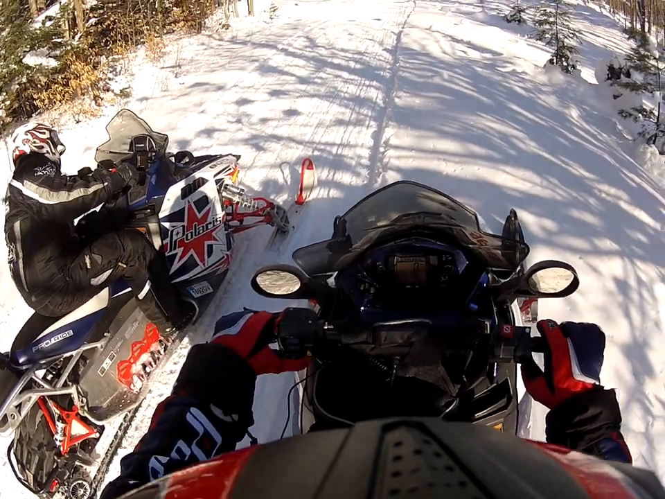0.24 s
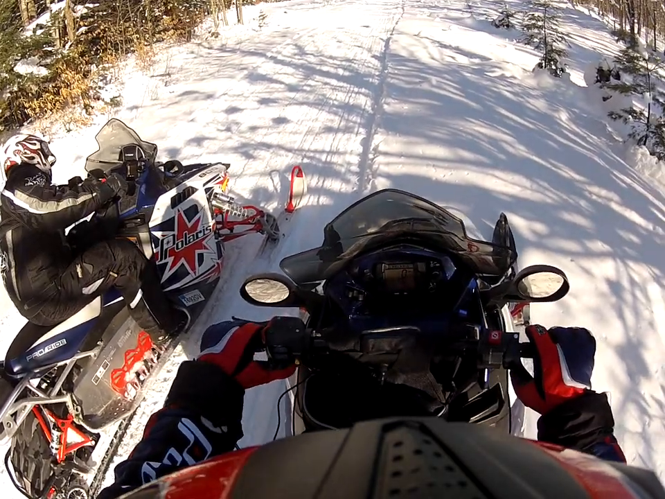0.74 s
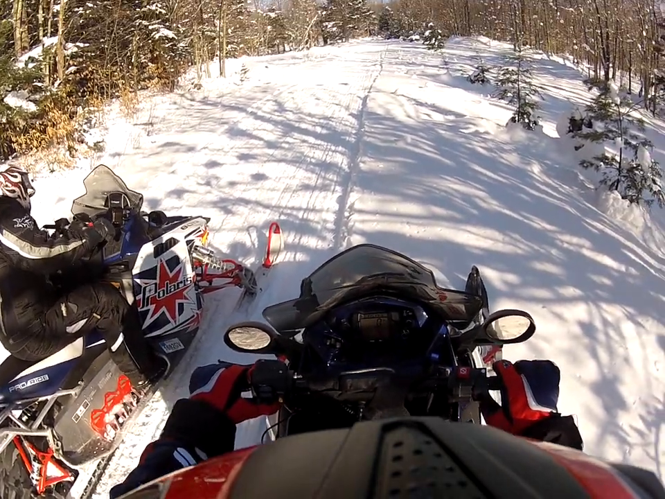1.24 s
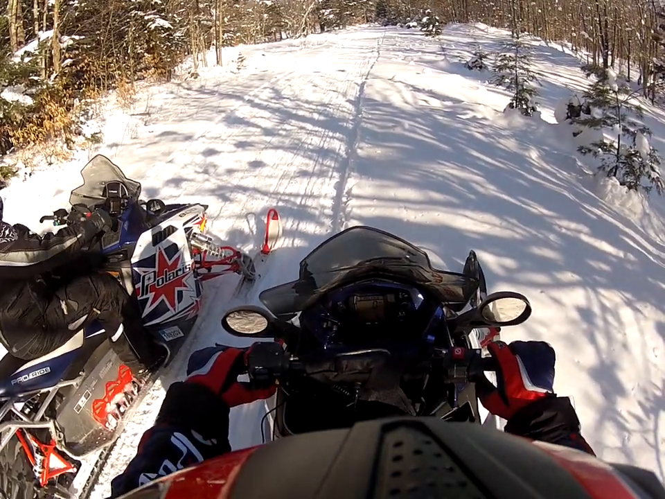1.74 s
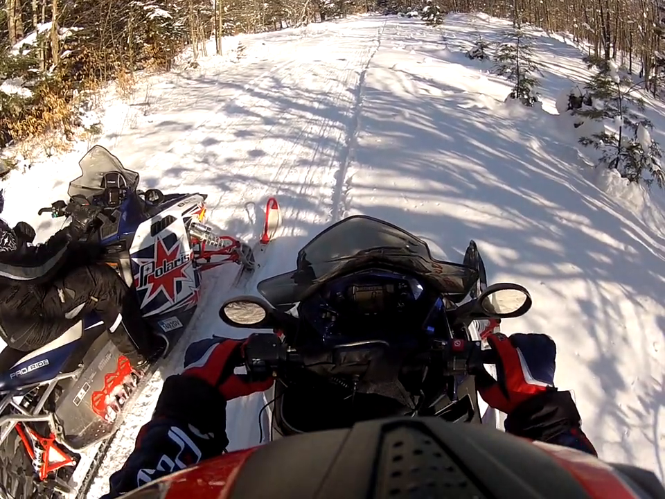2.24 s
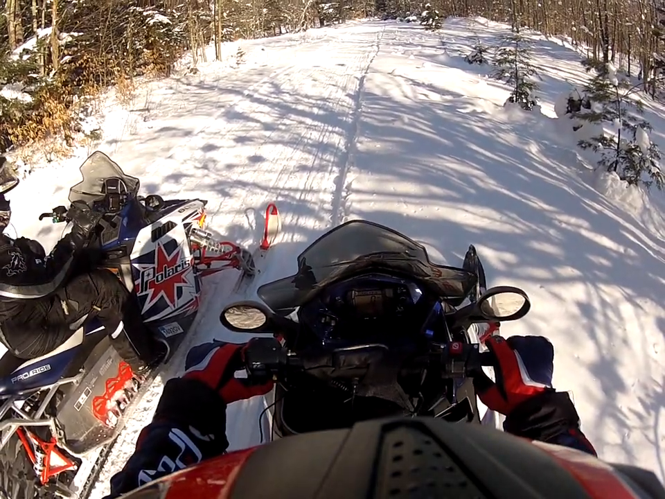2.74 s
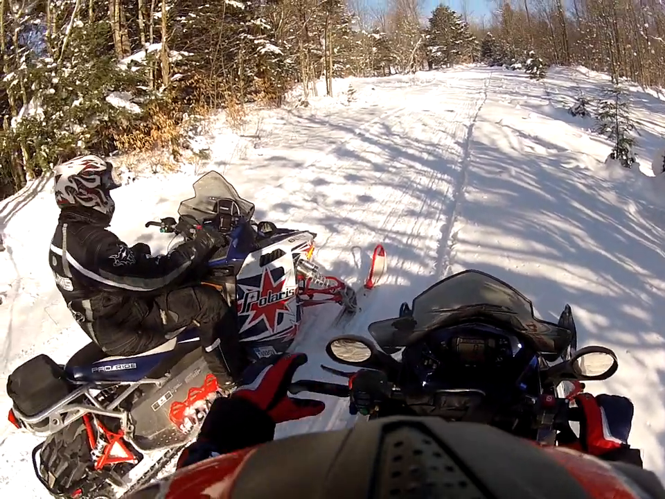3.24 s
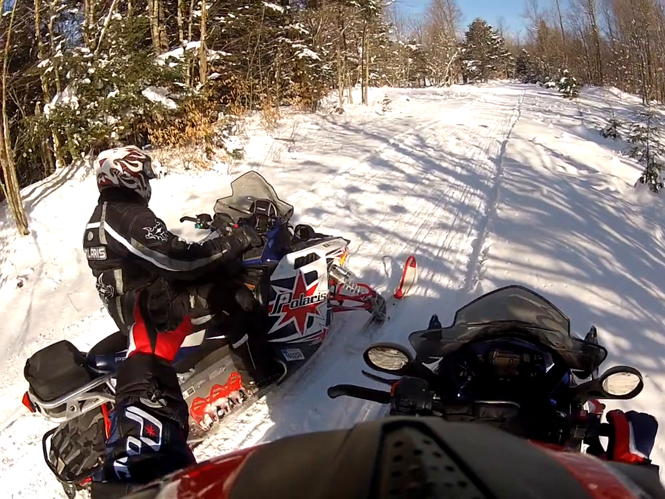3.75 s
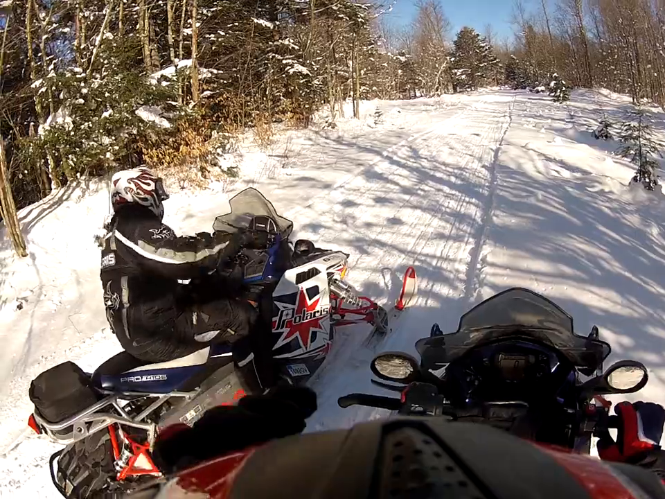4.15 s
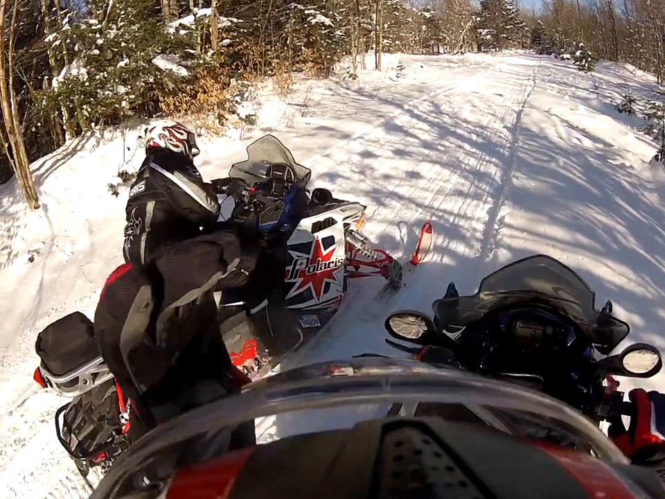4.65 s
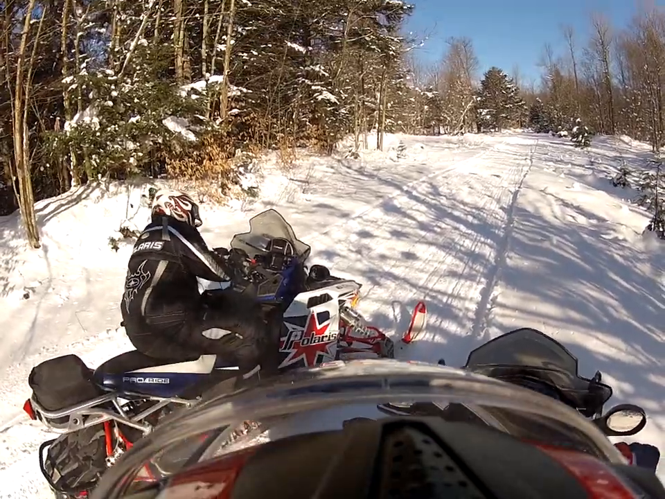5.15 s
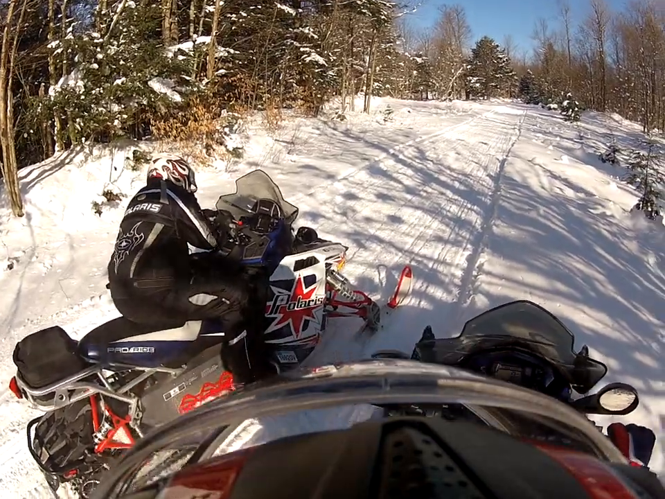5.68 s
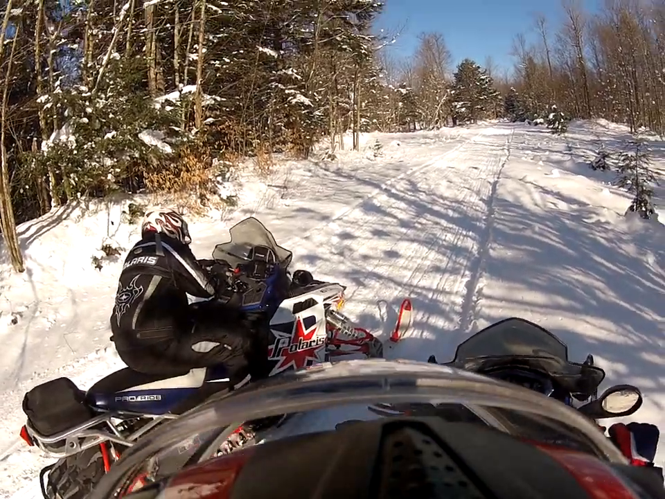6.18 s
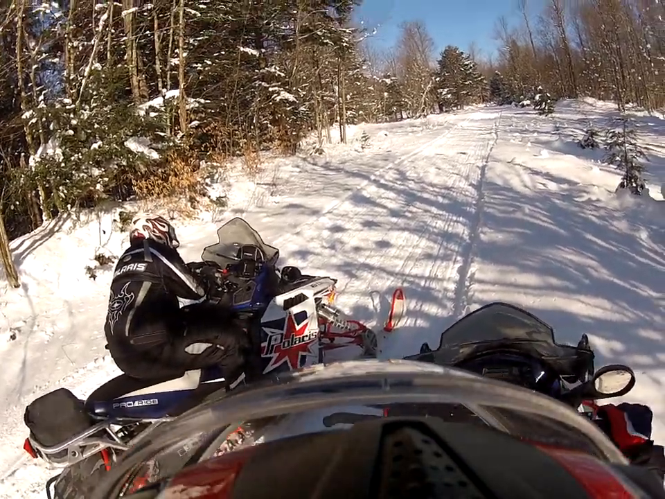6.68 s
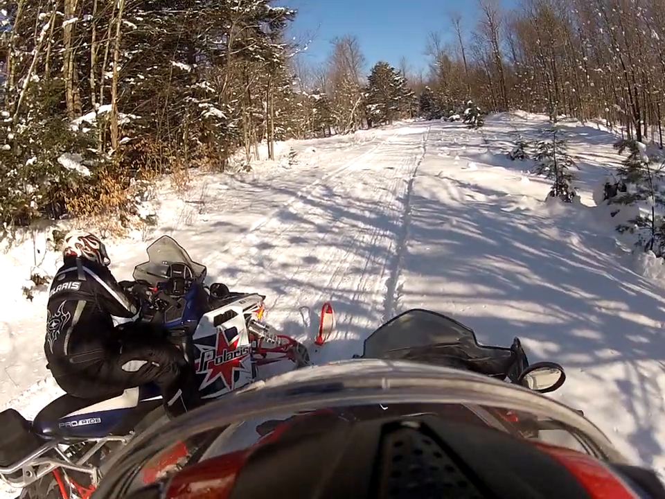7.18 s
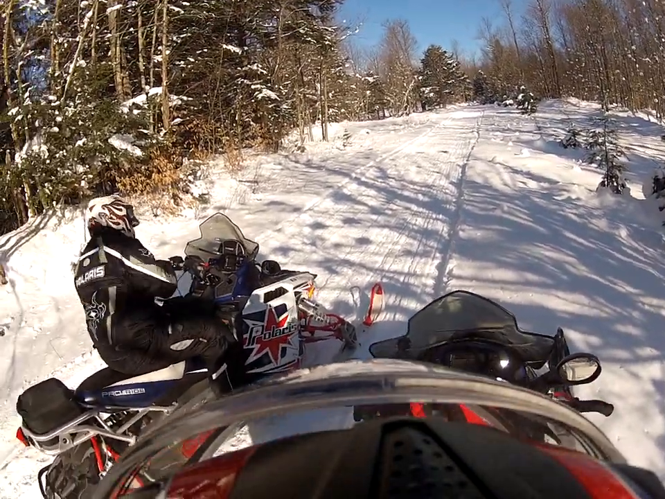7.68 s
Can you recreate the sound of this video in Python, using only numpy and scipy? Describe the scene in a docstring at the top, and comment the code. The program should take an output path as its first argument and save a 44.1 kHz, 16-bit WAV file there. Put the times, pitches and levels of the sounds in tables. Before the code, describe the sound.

Two snowmobiles idle side by side outdoors on a snowy trail, heard by a microphone on a rider's helmet. One two-stroke pops raggedly and falters; a four-stroke hums low with a light mechanical clatter. Midway, clothing rustles and small knocks tick close by, then the visor scrapes up in jolts and hits its stop with a loud, overloaded thump. The idling continues with faint rustles.

```python
"""A two-stroke engine pops unevenly over the hum of a four-stroke: two snowmobiles idle on a snowy trail,
heard through a rider's helmet microphone. Clothing rustles and ticks as the rider turns, then the visor scrapes
up over its detents and thumps against its stop, overloading a narrow-band recorder. Gas pushes ring a pipe,
crank orders hum, shaped noise clatters and rubs, and decaying sines make the blows."""
import sys
import numpy as np
from scipy import signal
from scipy.fft import rfft, irfft, next_fast_len
from scipy.io import wavfile
from scipy.ndimage import map_coordinates

SR = 44100
rng = np.random.default_rng(int(sys.argv[2]) if len(sys.argv) > 2 else 0)


def transcribe(u):
    """Save the signal u as a 16-bit wav file named by the first command-line argument.

    u: samples, shape (n,) or (channels, n), limited to [-1, 1]; the rate is SR.
    q: integer samples, one column per channel.
    """
    v = np.clip(np.atleast_2d(u).T, -1, 1)
    q = np.round(v * 32767).astype(np.int16)
    wavfile.write(sys.argv[1], SR, q)


N = 349255

STOP_S = 4.6535  # the visor reaches its stop

# The two-stroke's idle. Each row: time in seconds, mean firings per second, relative drone level in dB.
TWO_STROKE_IDLE = [(0, 38.8, -34.5), (.7, 38.8, -35), (1.35, 37.8, -37), (2, 39.4, -35.5), (2.9, 40.1, -37),
                   (3.3, 39.7, -38), (3.9, 41, -35.5), (4.4, 37.7, -36), (4.95, 40, -34.5),
                   (5.5, 40.5, -33.5), (5.9, 40, -34), (6.4, 40.8, -34.5), (7.2, 41.6, -39), (7.9, 40, -35)]
# Moments when it falters. Each row: middle in seconds, half length in seconds.
FALTERS = [(0.171, 0.043), (0.354, 0.033), (0.646, 0.039), (0.877, 0.016), (1.04, 0.071), (1.674, 0.053),
           (1.84, 0.055), (2.103, 0.012), (2.41, .04), (2.554, .06), (3.06, 0.054), (4.154, 0.04),
           (5.64, 0.078), (6.1, 0.021), (6.494, 0.043), (6.716, .06), (7.151, .07), (7.52, 0.023)]
# The exhaust pipe's resonance. Each row: frequency in Hz, relative level in dB.
EXHAUST_PIPE = [(8, -68), (28, -26.5), (46, -20), (68, -0.5), (81, 5), (95, 8), (115, -1.5), (132, 0),
                (158, -13), (192, -13.5), (245, -6), (280, -12.5), (306, -6.5), (370, -25), (700, -38)]
FALTER_DB = -12.5  # sag of the drone and of the quiet firings in a falter


def two_stroke(pop_db=0.0, drone_db=-3.5, under_db=-5.0, open_db=-7, octave_db=-19, lag_s=0.0032,
               waver_db=2.0, roam=0.57):
    """Source and resonator: firings excite the pipe, over a drone at two, three and six times their rate."""
    rate, level_db = curves(TWO_STROKE_IDLE)
    turns = firing_turns(rate)
    dips = sum(np.exp(-((clock() - s) / half) ** 2) for s, half in FALTERS)
    falter = np.minimum(dips, 1)
    # the drone lags the firings
    phase = 2 * np.pi * (turns - lag_s * rate)
    swell = amp(level_db + drone_db + FALTER_DB * falter + waver_db * wobble(22))
    third_order = np.cos(3 * phase + roam * wobble(18))
    sixth_order = amp(octave_db) * np.cos(6 * phase + wobble(30))
    # the second order drops once the visor is open
    under_level = amp(under_db + open_db * (clock() > STOP_S))
    second_order = under_level * np.cos(2 * phase + roam * wobble(11))
    drone = np.sqrt(2) * swell * (third_order + sixth_order + second_order)
    pops = amp(pop_db) * through(firings(turns, falter), EXHAUST_PIPE)
    return -(drone + pops)


# Single pops of the two-stroke, mostly its loudest, one short and sharp. Each row: time in seconds,
# push strength in dB, push length in seconds (the standard deviation of its bell).
SINGLE_POPS = [(.564, -23.5, 0.00043), (.794, -27, 0.0008), (1.115, -29, 0.00036), (1.309, -24.5, 0.00074),
               (1.556, -25.5, 0.00065), (1.896, -27, .0005), (2.144, -26, 0.00072), (2.346, -26, 0.0005),
               (2.62, -28.5, .0006), (2.882, -27, 0.00054), (3.506, -28, 0.00061), (4.038, -27.5, 0.00056),
               (4.209, -26.5, .0007), (4.931, -28.5, 0.0004), (5.494, -27, 0.00065), (5.628, -32, .0002),
               (5.793, -25, 0.0011), (6.144, -28, 0.00054), (6.547, -29, 0.00058), (7.266, -28.5, 0.00065),
               (7.813, -27.5, .0003)]
HUNT = 0.0319  # scale of the firing rate's random wander, as a share of the rate


def firing_turns(rate):
    """Frequency integrates to phase: revolutions of the hunting crank, bent so each single pop is a firing."""
    turns = np.cumsum(rate * (1 + HUNT * wobble(13))) / SR
    single_s = np.transpose(SINGLE_POPS)[0]
    lead = np.unwrap(np.interp(single_s, clock(), turns) % 1, period=1)
    return turns - np.interp(clock(), single_s, lead)


POP_SHARE = .31  # average share of the firings that catch hard
POP_DB, POP_SCATTER_DB = -29.5, 1.5  # push strength of an ordinary pop and its random spread
FULL_PUSH_S, LEAN_PUSH_S, LEAN_DB = 0.0005, 0.00026, -1  # in a falter the pops turn short, sharp and weaker
AFTER_DB = -8  # the firing that follows a pop is still strong: its level below the pop


def firings(turns, falter, jitter_s=.0014, soft_db=-44, scatter_db=4, length_spread=0.24):
    """Irregular combustion: one gas push a revolution, most soft, some catching hard, plus the single pops."""
    single_s, single_db, single_length = np.transpose(SINGLE_POPS)
    single_numbers = np.round(np.interp(single_s, clock(), turns))
    numbers = np.setdiff1d(np.arange(1, int(turns[-1])), single_numbers)
    times = np.interp(numbers, turns, clock())
    slip, size, stretch, luck = rng.standard_normal((512, 4))[:len(times)].T
    # unburnt fuel gathers at an uneven pace until a firing catches
    fuel = np.cumsum(POP_SHARE * np.exp(.5 * luck - .125))
    hard = np.diff(np.floor(fuel), prepend=0) > 0
    lean = np.interp(times, clock(), falter)
    pop_db = POP_DB + POP_SCATTER_DB * size + LEAN_DB * lean
    after_pop = np.roll(hard, 1)
    quiet_db = np.where(after_pop, POP_DB + AFTER_DB, soft_db) + scatter_db * size + FALTER_DB * lean
    sizes = amp(np.where(hard, pop_db, np.minimum(quiet_db, POP_DB)))
    mean_length = FULL_PUSH_S + (LEAN_PUSH_S - FULL_PUSH_S) * lean
    lengths = mean_length * np.exp(length_spread * stretch)
    ordinary = pushes(times + jitter_s * slip, sizes, lengths)
    return ordinary + pushes(single_s, amp(single_db), single_length)


def pushes(times, sizes, lengths):
    """Time-bandwidth reciprocity: of these bell-shaped gas pushes, a longer one sounds duller."""
    steps = np.arange(-SR // 200, SR // 200)
    shapes = np.exp(-.5 * (steps / SR / np.reshape(lengths, (-1, 1))) ** 2)
    shapes = sizes[:, None] * shapes / shapes.sum(axis=1, keepdims=True)
    places = np.clip(np.round(times * SR).astype(int)[:, None] + steps, 0, N)
    return np.bincount(places.ravel(), shapes.ravel(), N + 1)[:N]


# The helmet jolting as the hand grips the visor and lifts it over its detents.
# Each row: time in seconds, relative strength in dB, rocking frequency in Hz.
DETENTS = [(4.249, -26, 45), (4.35, -34, 84.5), (4.497, -20.5, 100.3), (4.531, -4, 66.5), (4.567, -1, 52.8),
           (4.6016, -9.5, 67.4), (4.624, -14, 50)]
BOOM_HZ, BOOM_T60 = 70, .29  # the visor's boom and its 60 dB decay in seconds


def visor(jolt_cycles=0.66, snap_db=-9, boom_db=-0.5, slam_db=7, slam_t60=0.044, rise_s=0.0036):
    """Impulsive excitation: each detent rocks the helmet briefly; the stop leaves a damped boom."""
    def rock(cycles):
        """A windowed sine: one rocking motion about its middle."""
        return np.sin(2 * np.pi * cycles) * np.exp(-(cycles / jolt_cycles) ** 2)

    jolts = 0
    for s, db, hz in DETENTS:
        cycles = (clock() - s) * hz
        # a sharper snap sits inside the jolt
        jolts = jolts + amp(db) * (rock(cycles) + amp(snap_db) * rock(2 * cycles))
    t = np.maximum(clock() - STOP_S, 0)
    boom = amp(boom_db - 60 * t / BOOM_T60)
    slam = amp(slam_db - 60 * t / slam_t60)
    swing = (boom + slam) * (1 - np.exp(-t / rise_s))
    return jolts - swing * np.sin(2 * np.pi * BOOM_HZ * t) + clack()


# The visor's clack on its stop. Each row: frequency in Hz, starting level in dB, 60 dB decay in seconds.
CLACK_MODES = [(204, -4.5, 0.029), (390, -3.5, 0.017), (648, -5, 0.009), (956, -6.5, 0.0061),
               (1260, -14.5, 0.029), (2210, 6, 0.0093)]
CLACK_S = 4.66  # the visor's edge snaps home


def clack():
    """Modal synthesis: the stiff plastic rings for a few milliseconds as a sum of damped sines."""
    t = np.maximum(clock() - CLACK_S, 0)
    return sum(amp(db - 60 * t / t60) * np.sin(2 * np.pi * hz * t) for hz, db, t60 in CLACK_MODES)


# The four-stroke's hum. Each row: multiple of the crank speed, middle level in dB rms.
HUM_ORDERS = [(1, -56.5), (2, -48.5), (4, -50), (8, -62), (10, -67.5)]


def four_stroke(turns, waver_db=4.5):
    """Order synthesis: steady multiples of the crank speed, each slowly wavering in strength."""
    hum = 0
    for order, db in HUM_ORDERS:
        level = np.sqrt(2) * amp(db + waver_db * wobble(5.3))
        hum = hum + level * np.sin(2 * np.pi * (order * turns + rng.random()))
    return hum


# The four-stroke's mechanical noise. Each row: time in seconds, relative level in dB.
CLATTER_LEVEL = [(0, -54), (1.1, -55), (3, -56.5), (4.3, -53), (4.6, -53), (4.72, -65), (4.85, -55.5),
                 (6.5, -56), (7.2, -57), (7.9, -56.5)]
# Colour of the clatter with the visor shut. Each row: frequency in Hz, relative density in dB per Hz.
CLATTER_SHUT = [(240, -25), (400, -2.5), (580, -6), (637, -11), (811, -12), (907, -2), (1110, -10.5),
                (1220, -0.5), (1620, -2.5), (1770, -7.5), (2060, 3), (2280, -9), (2800, -10), (3100, -18),
                (3700, -11.5), (4810, -66), (8140, -120)]
# Colour of the clatter with the visor open. Each row: frequency in Hz, relative density in dB per Hz.
CLATTER_OPEN = [(240, -17.5), (400, 5), (460, -6.5), (631, -3.5), (850, -10.5), (907, -1), (987, -12),
                (1090, 0), (1300, 3.5), (1460, -5), (1810, -0.5), (1980, -4.5), (2220, 2.5), (2530, -10.5),
                (3700, -11), (4810, -53), (8140, -120)]


def clatter(turns, level_db=1, beat_db=1.0, flutter_db=1.0):
    """Modulated noise: it beats with the crank, changes colour as the visor opens and dips at the thump."""
    # four beats a revolution
    drive = amp(beat_db * np.cos(8 * np.pi * turns) + flutter_db * wobble(60))
    shut = unit(through(drive * rng.standard_normal(N), CLATTER_SHUT))
    opened = unit(through(drive * rng.standard_normal(N), CLATTER_OPEN))
    # equal-power crossfade from the first scrape to the stop
    lift = np.interp(clock(), [SCRAPES[0][0], STOP_S], [0, np.pi / 2])
    level = amp(curves(CLATTER_LEVEL)[0] + level_db)
    return level * (np.cos(lift) * shut + np.sin(lift) * opened)


# The visor's hinge rubbing. Each row: middle in seconds, half length in seconds, level at the middle in dB rms.
SCRAPES = [(4.494, 0.0068, -15.5), (4.508, 0.0093, -20.5), (4.535, 0.0058, -19.5), (4.569, 0.0067, -25),
           (4.57, 0.085, -44.5), (4.604, 0.014, -27.5), (4.643, 0.0078, -38.5), (4.656, 0.0016, -9.5),
           (4.6612, 0.001, -5.5), (4.667, 0.0022, -27.5), (4.689, 0.0035, -39.5)]
# The hinge's rasp. Each row: frequency in Hz, relative level in dB.
HINGE = [(120, -16), (300, -13), (450, -13.5), (620, -2), (780, -8), (950, -7.5), (1280, -5.5), (1500, -4),
         (1730, -5), (1870, 3), (2050, 1), (2330, -4.5), (2650, -17), (3400, -12.5), (3900, -22.5)]
# Fabric sliding over the helmet. Each row: middle in seconds, half length in seconds, level there in dB rms.
RUSTLES = [(3.08, 0.13, -48), (4.27, 0.037, -57.5), (5.76, 0.11, -59), (6.55, 0.061, -56),
           (6.9, 0.076, -48.5), (7.68, 0.1, -53.5)]
# The hiss of sliding fabric. Each row: frequency in Hz, relative level in dB.
FABRIC = [(300, 1.5), (700, -11), (1300, 2.5), (2200, 5), (2600, -5), (3500, -4), (3900, -11)]


def rubbing(strokes, colour, grain_db):
    """Friction noise: grainy, coloured by the surface, swelling and fading with each stroke."""
    force = sum(amp(db) * np.exp(-((clock() - s) / half) ** 2) for s, half, db in strokes)
    grains = unit(amp(grain_db * wobble(450)) * rng.standard_normal(N))
    # unit filter energy keeps the level of the noise
    return through(force * grains, colour) / np.linalg.norm(ring(colour))


# Small contacts of collar, glove and helmet. Each row: time in seconds, relative level in dB,
# relative level of the bright snap in dB.
CONTACTS = [(0.395, -34, -49), (0.419, -38, -52.5), (1.032, -34.5, -53), (3.173, -26.5, -58),
            (3.306, -28, -48), (3.379, -34.5, -56), (3.442, -32.5, -57.5), (4.08, -28, -52),
            (4.157, -27.5, -58), (4.28, -28, -77), (4.342, -11, -47.5), (4.448, -25.5, -62),
            (4.77, -38.5, -68), (4.815, -27, -62), (4.917, -32, -55.5), (5.007, -36.5, -59),
            (5.75, -35, -56), (5.997, -31, -63.5), (6.151, -40, -71.5), (6.526, -26.5, -57),
            (6.761, -37, -51), (7.695, -31.5, -59.5), (7.747, -31.5, -67)]
# The helmet shell's answer to contact. Each row: frequency in Hz, relative level in dB.
SHELL = [(150, 12), (400, -26.5), (620, -2), (760, -10.5), (900, 2), (1080, -15), (1300, 7), (1450, -4.5),
         (1600, 5.5), (1860, -2), (2250, 5), (2600, -37), (3900, -51)]
# The bright snap of a hard contact. Each row: frequency in Hz, relative level in dB.
SNAP = [(800, -50), (1700, 7.5), (2250, 5.5), (2700, -1.5), (3450, 2), (3900, -5)]


def ticks(t60=0.023, level_db=-10, click_db=12, snap_db=5, snap_t60=0.022):
    """Impact response: a click and a brief crunch excite the shell, with a bright snap on top."""
    out, t = np.zeros(N + SR), np.arange(SR // 10) / SR
    shell, edge = ring(SHELL), ring(SNAP)

    def strike(body, decay):
        """A click and decaying noise convolved with a body, at rms 1 over the first 10 ms."""
        crunch = rng.standard_normal(len(t)) * amp(-60 * t / decay)
        click = amp(click_db) * (t == 0)
        tick = signal.fftconvolve(crunch + click, body)
        return tick / np.std(tick[:SR // 100])

    for s, db, bright_db in CONTACTS + fidgets():
        dull = amp(db + level_db) * strike(shell, t60)
        bright = amp(bright_db + snap_db) * strike(edge, snap_t60)
        out[round(s * SR):][:len(dull)] += dull + bright
    return out[:N]


# Faint ticks while the rider looks round. Each row: start in seconds, end in seconds.
FIDGET_SPANS = [(5.7, 5.8), (6.25, 6.5), (7.68, 7.85)]
FIDGET_DB, FIDGET_SNAP_DB = -36.5, -62  # relative levels of the tick and of its snap


def fidgets(count=2):
    """Uniform random timing: a few faint contacts in each turn of the head."""
    return [(s, FIDGET_DB, FIDGET_SNAP_DB)
            for start, end in FIDGET_SPANS for s in rng.uniform(start, end, count)]


def amp(db):
    """Logarithmic level: decibels to gain."""
    return 10 ** (np.asarray(db) / 20)


def unit(x):
    """Normalisation by mean power: x at rms 1."""
    return x / np.sqrt(np.mean(x ** 2) + 1e-20)


def clock():
    """Uniform sampling: the time of each sample in seconds."""
    return np.arange(N) / SR


def curves(rows):
    """Linear interpolation: one value per sample for each column after the time."""
    s, *cols = np.transpose(rows)
    return [np.interp(clock(), s, c) for c in cols]


def wobble(rate):
    """Band-limited fluctuation: a smooth random curve, rate knots a second."""
    knots = rng.standard_normal(4096)
    return map_coordinates(knots, [clock() * rate], mode="wrap")


def filtered(x, response):
    """Linear filtering: the spectrum of x times a response of frequency."""
    m = next_fast_len(N + SR // 2)
    return irfft(rfft(x, m) * response(np.fft.rfftfreq(m, 1 / SR)), m)[..., :N]


def ring(points, size=8192):
    """Minimum phase: a body's causal impulse response, peak 1, from its (Hz, dB) spectrum."""
    f, db = np.transpose(points)
    hz = np.fft.rfftfreq(size, 1 / SR)
    # the spectrum fades out over the octave above its last point
    shape_db = np.interp(np.log(hz + 1), np.log(np.r_[f, 2 * f[-1]]), np.r_[db, -100])
    # folding the cepstrum onto positive times makes the response causal
    cepstrum = irfft(np.log(amp(shape_db)))
    cepstrum[1:size // 2] *= 2
    cepstrum[size // 2 + 1:] = 0
    h = irfft(np.exp(rfft(cepstrum)))
    return h / np.max(np.abs(h))


def through(x, points):
    """Convolution: x sounding through a body."""
    return signal.fftconvolve(x, ring(points))[:N]


# The four-stroke's crank. Each row: time in seconds, mean speed in Hz.
CRANK_SPEED = [(0, 31.18), (.7, 30.58), (1.1, 31.3), (2, 29.59), (2.8, 30.5), (3.4, 30.04), (3.9, 30.87),
               (5, 30.47), (5.9, 31.01), (6.5, 30.35), (7.1, 30.21), (7.9, 30.72)]


def scene():
    """Superposition: both engines and the helmet's own noises add at one microphone, on two equal channels."""
    turns = np.cumsum(curves(CRANK_SPEED)[0] * (1 + 0.01188 * wobble(8))) / SR
    engines = two_stroke() + four_stroke(turns) + clatter(turns)
    friction = rubbing(RUSTLES, FABRIC, grain_db=1.5) + rubbing(SCRAPES, HINGE, grain_db=2.5)
    return np.array([engines + friction + ticks() + visor()] * 2)


HOLD_HZ, TOP_HZ = 8000, 16100  # rate of the held samples, upper limit of the output


def record(dry, band_hz=3750, image_hz=15000):
    """Sample and hold: narrow-band samples mirror the sound into the treble; the loudest blows clip."""
    narrow = filtered(dry, lambda hz: 1 / np.sqrt(1 + (hz / band_hz) ** 44))
    phase = 2 * np.pi * HOLD_HZ * clock()
    # sampling places images round the hold rate and its double, the latter raised by 3.5 dB
    sampled = narrow * (1 + 2 * np.cos(phase) + 2 * amp(3.5) * np.cos(2 * phase))
    # holding each sample weakens them by a sinc
    held = filtered(sampled, lambda hz: np.sinc(hz / HOLD_HZ) / np.sqrt(1 + (hz / image_hz) ** 160))
    return filtered(np.clip(held, -1, 1), lambda hz: np.clip((TOP_HZ - hz) / 700, 0, 1))


dry = scene()
out = record(dry)
transcribe(out)
```